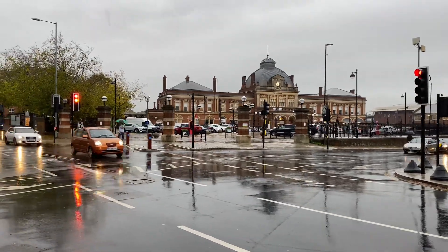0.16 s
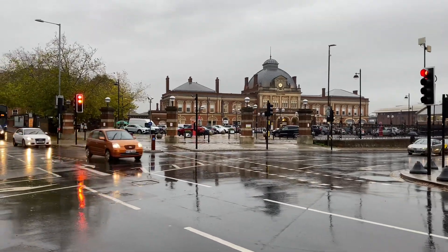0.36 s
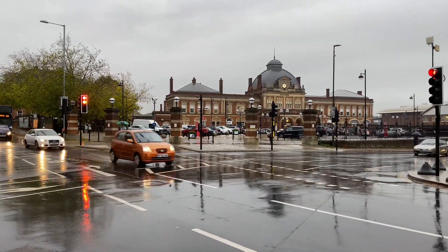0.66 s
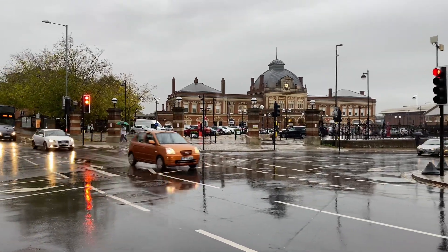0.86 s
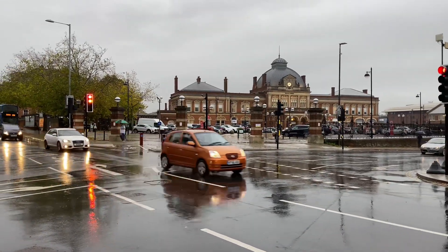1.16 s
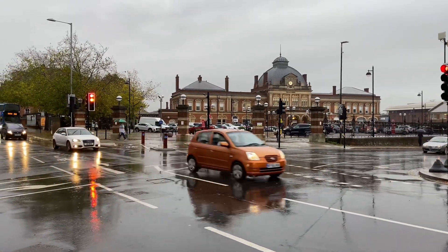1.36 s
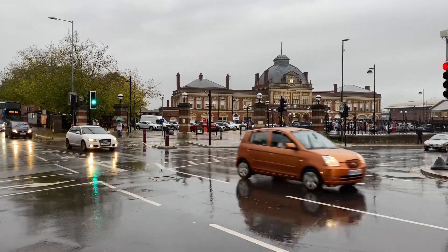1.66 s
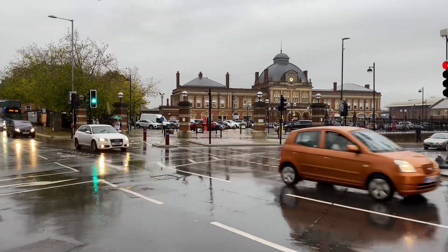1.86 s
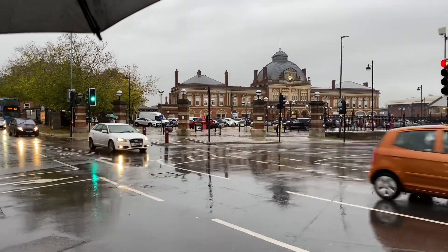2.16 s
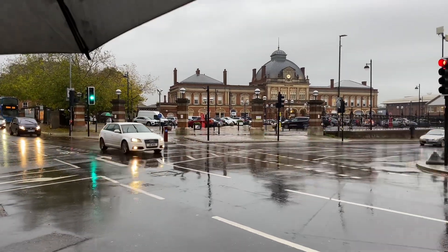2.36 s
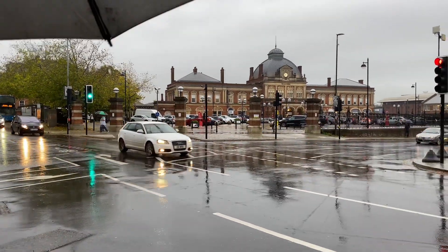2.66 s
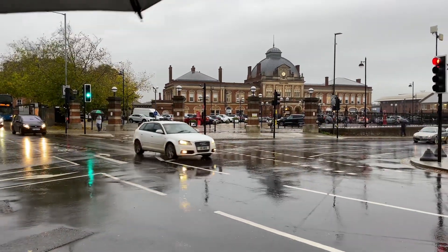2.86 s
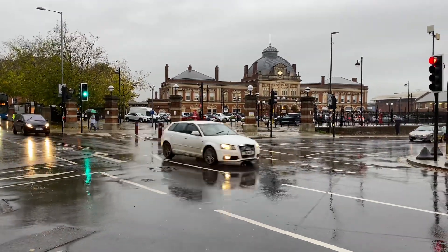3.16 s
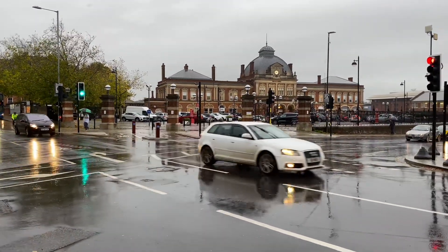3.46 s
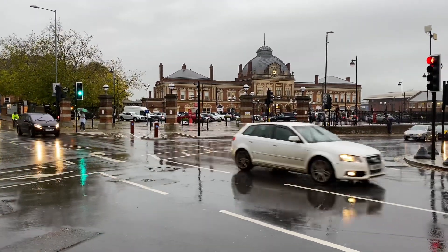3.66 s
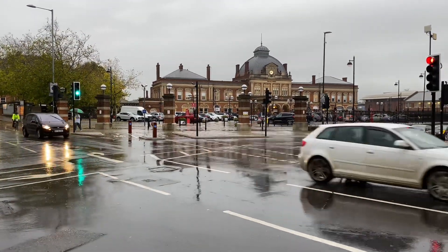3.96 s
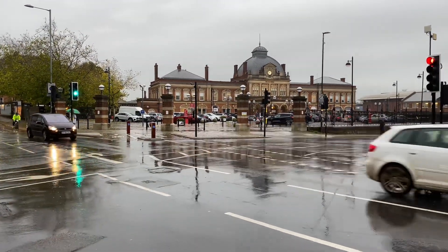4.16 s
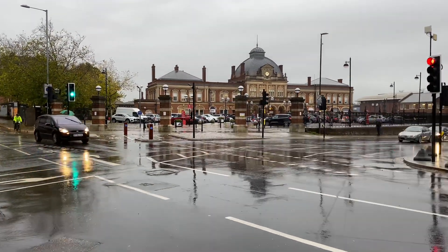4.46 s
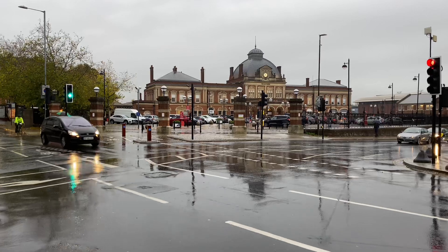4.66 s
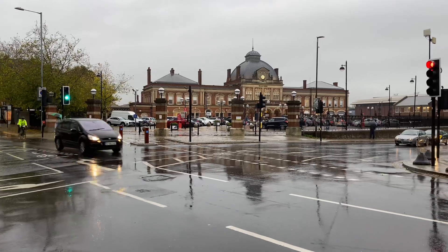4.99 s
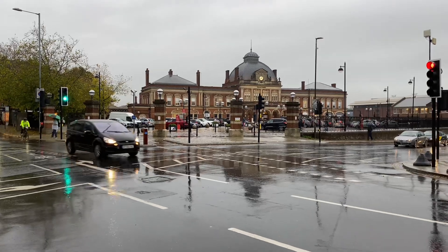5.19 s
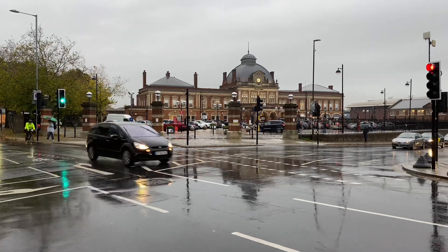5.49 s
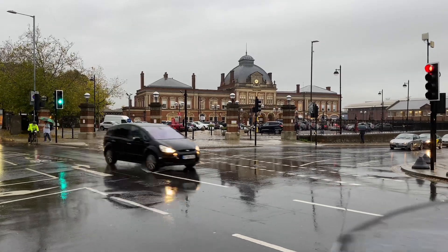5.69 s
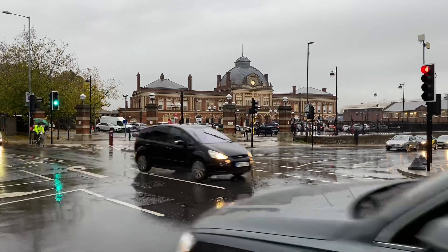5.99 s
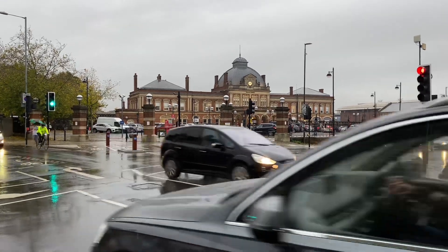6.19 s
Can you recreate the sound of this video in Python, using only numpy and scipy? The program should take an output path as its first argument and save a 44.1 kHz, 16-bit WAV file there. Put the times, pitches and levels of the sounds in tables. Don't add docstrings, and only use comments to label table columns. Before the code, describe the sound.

At a rainy road junction, heard in stereo from the kerb under an umbrella, wet tyres roar and hiss past from left to right. The first car sings faintly, squelches through a puddle and thuds over a bump; a second follows with brighter spray, then another approaches. Engines drone low beneath, drops tap the cloth overhead, and distant town rumble fills the background.

```python
import sys
import numpy as np
from scipy import signal
from scipy.io import wavfile
from scipy.ndimage import uniform_filter1d

SR = 44100
rng = np.random.default_rng(int(sys.argv[2]) if len(sys.argv) > 2 else 0)


def master_out(mix):
    frames = np.transpose(np.atleast_2d(mix))
    ceiling = np.clip(frames, -1, 1)
    pcm = np.round(ceiling * 32767).astype(np.int16)
    wavfile.write(sys.argv[1], SR, pcm)


def decibels_to_gain(level_db):
    exponent = np.asarray(level_db, float) / 20
    return 10 ** exponent


N = 279153


def evened(x):
    return x / np.sqrt(np.mean(abs(x) ** 2) + 1e-20)


def read(points, hz):
    f, value = np.transpose(points)
    return np.interp(np.log(hz + 1), np.log(f + 1), value)


def follow_rows(rows):
    s, *columns = np.transpose(rows)
    t = np.arange(s[0], s[-1], 1 / SR)
    hz, level_db = (np.interp(t, s, c) for c in columns)
    return s[0], t, hz, level_db


def add(mix, s, sound):
    part = mix[:, round(s * SR):][:, :sound.shape[-1]]
    part += sound[..., :part.shape[1]]


def chance(shape, *size):
    x = rng.standard_normal(shape)
    for axis, width in enumerate(size):
        x = uniform_filter1d(uniform_filter1d(x, width, axis), width, axis)
    return evened(x)


def hush(frames, bins):
    return np.dot(rng.standard_normal((frames, bins, 2)), [1, 1j]).T


def wash(frames, hz):
    # frequency in Hz, likeness of left and right from -1 to 1
    likeness = [(60, .97), (130, .85), (290, .25), (500, -.45), (750, -.6), (1400, -.05), (3000, .15),
                (8000, .1)]
    same = np.clip(read(likeness, hz), -1, 1)[:, None]
    left = hush(frames, len(hz))
    return np.array([left, same * left + np.sqrt(1 - same ** 2) * hush(frames, len(hz))])


def traffic(t):
    # time in seconds, weight of traffic on the junction in dB, water off the nearest tyres in dB
    flow = [(0, -5.5, -11.5), (0.249, -5.5, -13.5), (.6, -5, -7.5), (.85, -5, -5), (1.15, -4, -.6),
            (1.5, -3, -2), (1.72, -2.5, -1.3), (2.15, -0.9, -0.5), (2.4, -1, -4), (2.75, -1.5, -1),
            (3.05, -0.2, 0.2), (3.7, -0.3, .1), (4.1, 0.26, -2.5), (4.5, 0.46, -5), (5.05, 0.25, -7),
            (5.5, -1.05, -2), (6.05, 0.65, 1.4), (6.33, -1.5, -3)]
    # time in seconds, swell in dB, length in seconds
    splashes = [(0.879, 4, 0.044), (1.152, 2.5, 0.036), (1.7, 2, 0.046), (2.181, 0.2, .06),
                (3.06, 1, 0.036), (3.61, 3.5, 0.032), (4.08, 3.5, 0.067), (4.893, 1, 0.023),
                (5.281, 2.8, 0.061), (5.416, 2.2, .03), (5.752, 0.5, .04), (5.871, 3, 0.031)]
    s, weight_db, water_db = np.transpose(flow)
    at, swell_db, length = np.transpose(splashes)[..., None]
    u = (t - at) / length
    u = np.where(u < 0, u / 0.28, u)
    splash_db = (swell_db * np.exp(-u ** 2)).sum(0)
    return np.interp(t, s, weight_db), np.interp(t, s, water_db), splash_db


def passing(car, t, hz, shade_db=2.0, turn_s=0.25, fade_s=0.17):
    # seconds from passing, lag of the left port in ms
    arc = [(-1.9, -.19), (-1.35, -.15), (-1.05, -.05), (-.08, .02), (.12, .22), (.65, .28), (1.1, .42),
           (1.9, .44)]
    comes, passes, goes, near_db = car
    hz = hz[:, None]
    across = .5 + .5 * np.tanh((t - passes) / turn_s)
    leaving_bass_db, leaving_treble_db, treble_hz = 4, -2, 1480
    leaving_db = leaving_treble_db + (leaving_bass_db - leaving_treble_db) / (1 + (hz / treble_hz) ** 4)
    near = decibels_to_gain(near_db + leaving_db * across)
    near = near / (1 + np.exp((comes - t) / fade_s)) / (1 + np.exp((t - goes) / fade_s))
    lag = np.interp(t - passes, *np.transpose(arc))
    bend = 1 + .5 * np.exp(-hz / 500)
    shade = decibels_to_gain(shade_db * lag * np.sqrt(hz / 4000))
    port = np.exp(-1j * np.pi * hz * bend * lag / 1000) / shade
    return near, np.array([port, 1 / port])


def tyres(patchy_db=0.71, flicker_db=0.71, gust_db=0.46, streak_db=1.5):
    # comes in seconds, passes the axis of the ports in seconds, goes in seconds, nearness in dB
    cars = [
        (-1.5, 1.87, 3.97, -5),
        (2.5, 3.82, 5.51, -5),
        (4.5, 6.4, 8, -8),
    ]
    # frequency in Hz, level in dB
    roar = [(200, -1), (330, -1), (500, -2.5), (750, -0.2), (1100, -1), (1400, -24), (2200, -27)]
    # frequency in Hz, level in dB
    hiss = [(700, -11), (1300, 0), (1900, 0.5), (2800, -0.5), (3800, -5), (5000, -7.5), (7500, -25.5)]
    # frequency in Hz, level in dB
    spray = [(2500, -7.5), (4200, 0.5), (5500, 2), (7000, 1.4), (8300, -1.5), (10500, -6.5), (14000, -38)]
    # frequency in Hz, level in dB
    mist = [(6000, -22), (8300, 0), (10000, 2), (12000, 1.5), (14000, -1.5), (15700, -3)]
    # level in dB, then dB per dB of traffic, of water, of splash
    follow = [
        (-34.5, .95, -0.02, 0.2),
        (-33.5, 1.15, 0.23, 0.23),
        (-37.5, 1.2, .3, 1.23),
        (-40.5, -0.27, 1.1, 0.7),
    ]
    # frequency in Hz, left over right in dB
    lean = [(60, .5), (300, 1), (900, .1), (1700, .5), (3200, 3), (5500, 2.2), (7200, 0.1), (16000, 0.1)]
    frames, hz = N // 128 + 5, np.fft.rfftfreq(512, 1 / SR)
    t = np.arange(frames) * 128 / SR
    wash_gain = decibels_to_gain(-3.5)
    z, weight = wash_gain * wash(frames, hz), wash_gain ** 2
    for car in cars:
        near, ports = passing(car, t, hz)
        z = z + near * hush(frames, len(hz)) * ports
        weight = weight + near ** 2
    rough_db = patchy_db * chance((frames, len(hz)), 12, 5).T
    rough_db = rough_db + streak_db * chance((frames, len(hz)), 70).T
    bright = np.clip(hz / 9000, 0, 1.3)[:, None]
    rough_db = rough_db + bright * (flicker_db * chance(frames, 3) + gust_db * chance(frames, 14))
    power, now = 0, traffic(t)
    for shape, (db, *share) in zip((roar, hiss, spray, mist), follow):
        level = decibels_to_gain(db + np.dot(share, now))
        power = power + (evened(decibels_to_gain(read(shape, hz)))[:, None] * level) ** 2
    tilt = decibels_to_gain(read(lean, hz) * np.array([[.5], [-.5]]))[..., None]
    z = z * np.sqrt(power / weight) * decibels_to_gain(rough_db) * tilt
    unit = np.std(signal.istft(hush(frames=99, bins=len(hz)), nperseg=512, noverlap=384)[1])
    return decibels_to_gain(2.5) * signal.istft(z, nperseg=512, noverlap=384)[1][:, :N] / unit


def whistle(rows, orders, width_hz=34):
    start, t, hz, db = follow_rows(rows)
    r, out = np.exp(-np.pi * width_hz / SR), 0
    turns = np.cumsum(hz) / SR
    for k, under_db in orders:
        slow = signal.lfilter([1], np.convolve([1, -r], [1, -r]), hush(len(t), 1)[0])
        out = out + decibels_to_gain(under_db) * evened((slow * np.exp(2j * np.pi * k * turns)).real)
    return start, decibels_to_gain(db) * out * np.ones((2, 1))


def tread():
    # time in seconds, block rate in Hz, level in dB
    song = [(.2, 1110, -54), (.5, 1075, -42), (.75, 1056, -49), (1.1, 1057, -47), (1.4, 1099, -45),
            (1.6, 1112, -41), (1.9, 1117, -41), (2.1, 1151, -48), (2.35, 1153, -48)]
    return whistle(song, [(1, -4), (.54, -4.5), (.68, -4.0)])


def puddle():
    # time in seconds, pitch in Hz, level in dB
    squelch = [(1.59, 1280, -52), (1.63, 1400, -44), (1.67, 1750, -46), (1.7, 2080, -40),
               (1.735, 2450, -44), (1.77, 2750, -50), (1.8, 2900, -56)]
    return whistle(squelch, [(1, 0)], width_hz=70)


def engine(rows, extra=(), boom=(1, 1, 0), waver=.008, throb_db=1.5, lag=16):
    # time in seconds, change in dB, half width in seconds
    stumble = (2.715, -9, .04)
    start, t, hz, level_db = follow_rows(rows)
    stumble_db = stumble[1] * np.exp(-((t - stumble[0]) / stumble[2]) ** 2)
    turns = np.cumsum(hz * (1 + waver * chance(len(t), 1500))) / SR
    boom_hz, boom_width_hz, boom_db = boom
    tone = 0
    for k, db in [(1, 0), *extra]:
        order_db = level_db + db + stumble_db / k ** 2
        order_db = order_db + boom_db / (1 + ((k * hz - boom_hz) / boom_width_hz) ** 2)
        order_db = order_db + throb_db * np.sqrt(k) * chance(len(t), 2500)
        tone = tone + decibels_to_gain(order_db) * np.sin(2 * np.pi * (k * turns + rng.random()))
    tone = np.sqrt(2) * tone * signal.windows.tukey(len(t), .04)
    return start, np.array([np.roll(tone, round(lag)), tone]) * decibels_to_gain([[.3], [-.3]])


def engines():
    # time in seconds, firing rate in Hz, level in dB
    small_car = [(0, 80.8, -39), (.2, 78.7, -30.5), (.45, 78.6, -39.5), (.8, 78.4, -26), (1, 71.8, -33.5),
                 (1.2, 69.6, -32.5), (1.4, 70.8, -34), (1.62, 72.5, -30.5), (1.95, 67.66, -44)]
    low_drone = [(.1, 52, -41), (.4, 53.4, -41), (.7, 52.4, -41), (.9, 50.6, -37), (1.2, 52.45, -45),
                 (1.5, 54.36, -33), (1.75, 53.55, -35), (1.95, 52.46, -40)]
    rising = [(.3, 102.4, -40.5), (1.1, 105.1, -35.5), (1.4, 109, -39.5), (1.7, 112, -36), (2, 118, -36.5),
              (2.6, 128.1, -32), (3.1, 132, -39), (3.35, 133, -30), (3.9, 119.7, -38)]
    estate = [(3.42, 98, -58), (3.55, 95.1, -40), (3.7, 92.5, -35), (3.85, 86.4, -30.5), (4, 84.05, -33),
              (4.3, 84.87, -30.5), (4.9, 86.1, -36.5), (5.5, 88.16, -43.5), (6.33, 80, -37)]
    late_drone = [(3.4, 50.9, -41), (3.6, 50.3, -37), (3.8, 53.94, -25.5), (4.2, 52.04, -42.5),
                  (4.45, 55.8, -30), (4.85, 58.99, -33), (5.6, 57.47, -36), (5.85, 57.2, -35),
                  (6.33, 56.9, -28)]
    idler = [(1.85, 66.4, -40), (2.05, 66.35, -29), (2.6, 67.4, -23), (3, 66.5, -20), (3.45, 66.2, -32),
             (4.05, 66, -38), (4.3, 67.5, -32.5), (5.6, 65.5, -35), (6.33, 66.5, -35)]
    # frequency in Hz, width in Hz, gain in dB
    exhaust = (94, 5, 15)
    return [engine(small_car, [(2, -19)], lag=-8),
            engine(low_drone),
            engine(rising),
            engine(estate, [(2, -16), (2.5, -9.5)], exhaust),
            engine(late_drone),
            engine(idler, [(3, -15.5), (3.95, -19)], throb_db=1.15)]


def bump(db, hz, t60):
    t = np.arange(0, .4, 1 / SR)
    swell = 1 - np.exp(-t / .012)
    return decibels_to_gain(db - 60 * t / t60) * swell * np.sin(2 * np.pi * hz * t * (1 - 1.2 * t))


def bumps():
    # start in seconds, peak in dB, pitch in Hz, time to fall 60 dB in seconds
    thuds = [
        (1.465, -23, 160, .14),
        (2.11, -14, 152, .17),
    ]
    return [(s, bump(*row)) for s, *row in thuds]


def tap(db, hz, pan_db):
    cycles = np.arange(300) / SR * hz
    knock = np.sin(2 * np.pi * 3.5 * (1 - np.exp(-cycles / 2.5)))
    shape = cycles ** 2 * np.exp(2 - 1.9 * cycles) * knock
    panel = cycles * np.exp(1 - cycles / 1.6) / 1.6 * np.sin(2 * np.pi * cycles / 3.5)
    shape = shape - .45 * panel
    return decibels_to_gain(db) * shape * decibels_to_gain(np.clip(pan_db, -6, 6) * np.array([[.5], [-.5]]))


def taps():
    # start in seconds, peak in dB, pitch in Hz, left over right in dB
    drops = [(.0787, -21.5, 2050, 4), (.356, -29, 1600, 4), (.883, -30, 1500, 3), (1.234, -28, 1700, 2),
             (1.689, -27, 2100, 2), (1.93, -27, 1600, 1), (3.657, -24, 2300, 1), (4.471, -25, 2300, 0),
             (4.947, -25, 1800, 1), (5.5044, -17, 2450, 5), (5.748, -25, 1800, 1), (5.869, -25, 2000, 1),
             (6.142, -23, 2300, 1)]
    return [(s + .0006, tap(*row)) for s, *row in drops]


def patter(per_s=260, db=-44, spread_db=0.5):
    size = decibels_to_gain(spread_db * np.minimum(rng.exponential(1, N), 4)) * (rng.random(N) < per_s / SR)
    kind, out = rng.integers(0, 10, N), np.zeros((2, N))
    for k, hz in enumerate(np.geomspace(900, 9000, 10)):
        drop = tap(0, hz, rng.uniform(-6, 6))
        out += signal.oaconvolve((size * (kind == k))[None], drop, axes=1)[:, :N]
    return decibels_to_gain(db) * evened(out)


def rumble():
    # frequency in Hz, level in dB
    town = [(12, -41), (20, -39), (48, -5.5), (76, 0), (99, -8.5), (145, -7), (236, -11), (292, -17.5),
            (400, -28.5), (520, -20.5), (880, -120)]
    hz = np.fft.rfftfreq(4096, 1 / SR)
    weight_db, water_db, _ = traffic(np.arange(N) / SR)
    z = wash(N // 1024 + 5, hz) * decibels_to_gain(read(town, hz))[:, None]
    low = evened(signal.istft(z, nperseg=4096, noverlap=3072)[1][:, :N])
    return low * decibels_to_gain(-31.5 + weight_db - 0.072 * water_db)


def scene():
    mix = tyres() + patter() + rumble()
    for s, sound in [tread(), puddle(), *engines(), *bumps(), *taps()]:
        add(mix, s, sound)
    return mix


def low_pass(x):
    return signal.sosfilt(signal.butter(12, 17050, fs=SR, output="sos"), x)


def record(dry):
    # low edge in Hz, high edge in Hz, sign of the right side,
    joined = [
        (8350, 9550, -1, .25, 0, 0),
        (10400, 11750, 1, .03, .1, 200),
        (12450, 13750, -1, .1, .55, 750),
        (14450, 16400, 1, .02, 0, 0),
    ]
    # start in seconds, end in seconds, low
    # edge in Hz
    spells = [(0, .64, 6700), (.72, .9, 6900), (1.15, 2.37, 6450), (2.64, 3.15, 7000), (3.15, 3.5, 6450),
              (3.68, 4.06, 6900), (4.36, 5.22, 6950), (5.76, 5.88, 7000), (5.93, 6.33, 7000)]
    hz, t, z = signal.stft(dry, SR, nperseg=2048)
    hz, sign = hz[:, None], np.zeros(z.shape[1:])
    shared = .72 * np.clip((hz - 5800) / 1200, 0, 1)
    turned = z[0] * np.exp(1j * np.pi * (hz - 7000) / 2050)
    right = shared * turned + np.sqrt(1 - shared ** 2) * z[1]
    for low, high, turn, low_share, high_share, step in joined:
        a, b, c = rng.random((len(t), 3)).T
        above = hz > low + 340 * (a < low_share)
        below = hz < high + step * c * (b < high_share)
        sign[above & below] = turn
    for start, end, low in spells:
        above = hz > low + 250 * chance(len(t), 2)
        sign[above & (hz < 7600) & (t > start) & (t < end)] = 1
    right = np.where(sign == 0, right, sign * z[0])
    z = np.array([z[0], right]) * (hz < 15770)
    return low_pass(signal.istft(z, SR, nperseg=2048)[1][:, :N])


dry = scene()
out = record(dry)
master_out(out)
```